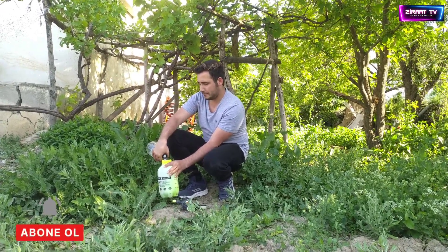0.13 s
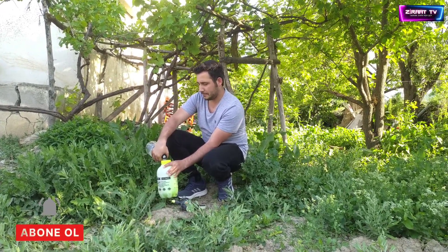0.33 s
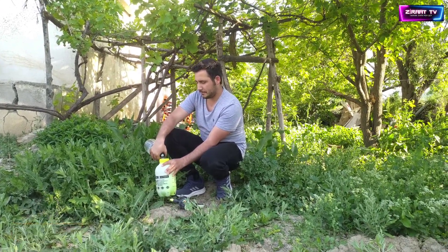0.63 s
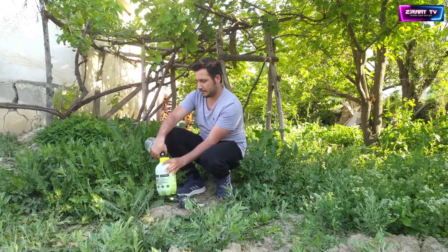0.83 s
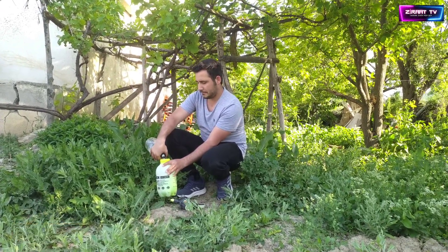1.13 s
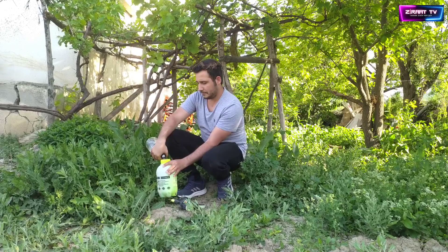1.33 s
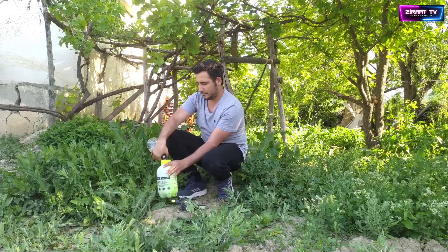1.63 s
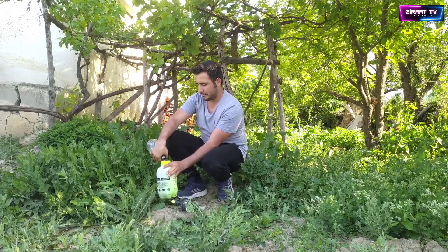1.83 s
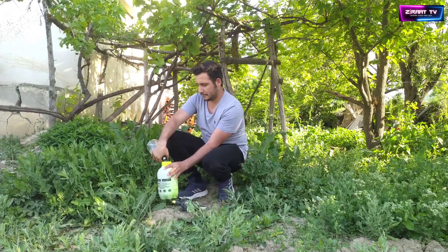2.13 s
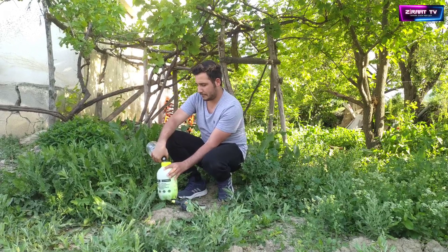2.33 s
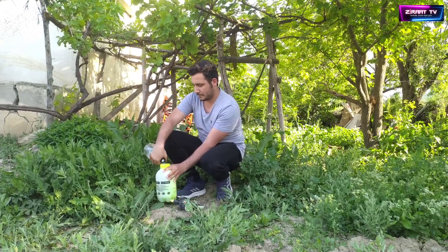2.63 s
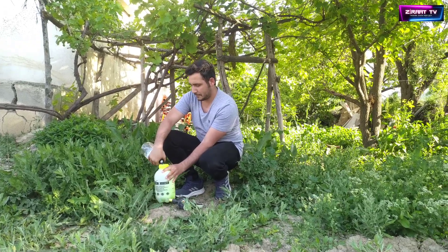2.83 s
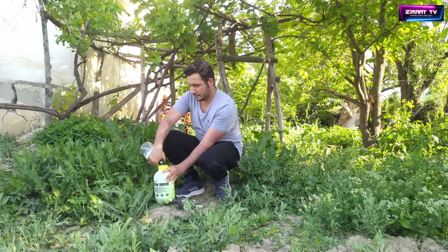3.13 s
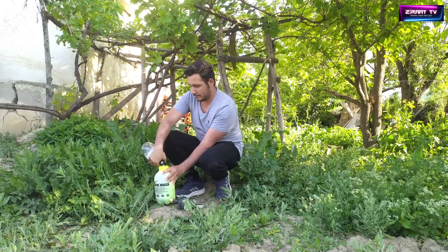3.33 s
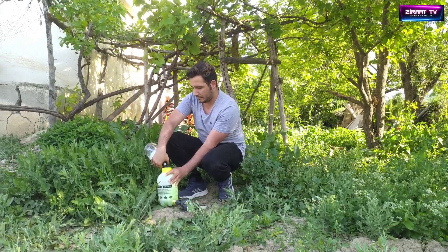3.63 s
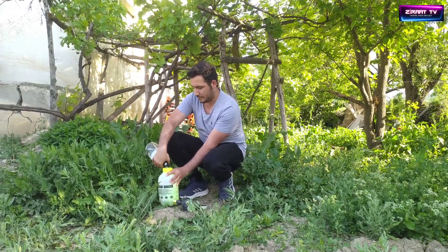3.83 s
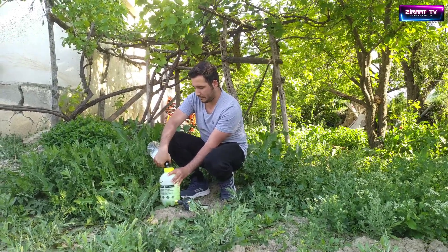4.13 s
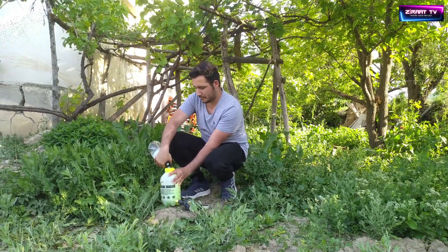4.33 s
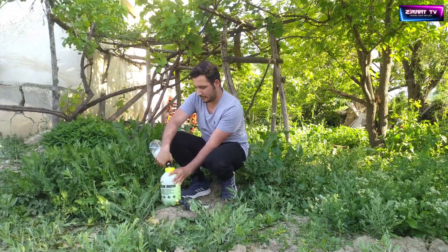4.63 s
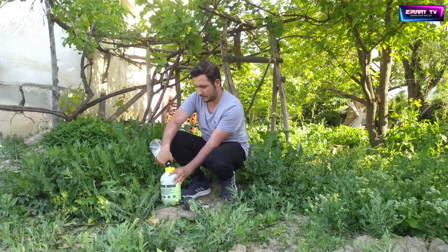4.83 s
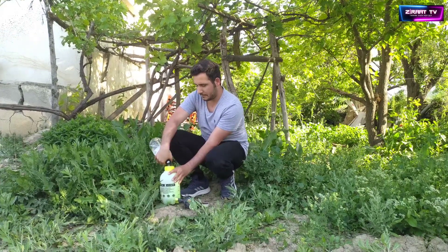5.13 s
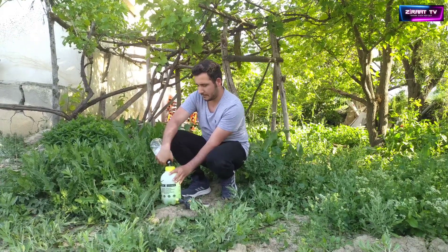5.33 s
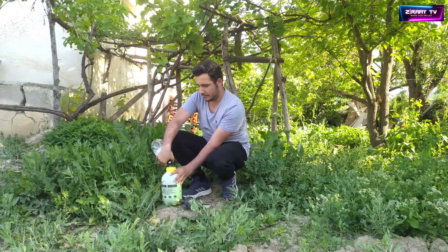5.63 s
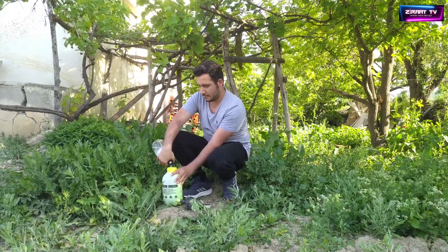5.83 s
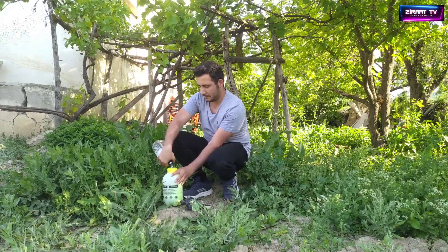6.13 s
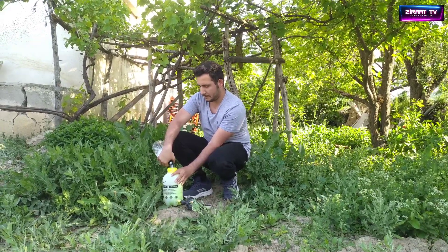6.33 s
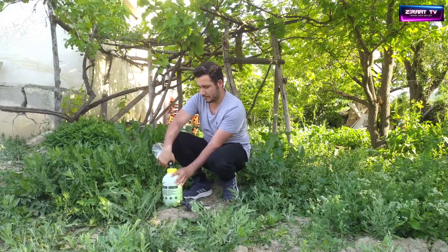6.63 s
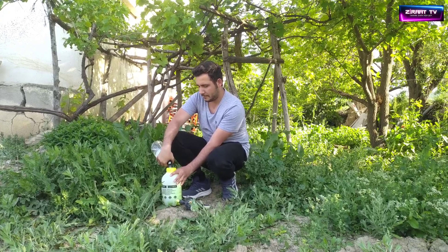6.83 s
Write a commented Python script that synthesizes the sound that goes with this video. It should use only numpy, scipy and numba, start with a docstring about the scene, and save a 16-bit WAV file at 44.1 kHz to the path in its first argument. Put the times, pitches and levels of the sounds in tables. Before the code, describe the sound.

Liquid glugs quickly and steadily from a plastic bottle into a plastic tank while sparrows chirp loudly all around a leafy garden.

```python
"""Pouring among sparrows

Liquid glugs from a plastic bottle into a garden sprayer's tank: some fourteen gulps of air a second
ring as bubbles, the stream splashes, and the resonance of the tank's air rises as the tank fills.
Hollow plastic booms as damped modes, and drops tick as short noise bursts over a fine fizz.
Sparrows chirp loudly all around, as two-voiced frequency-modulated whistles scattered by leaves and a wall.
Filtered noise makes a faint outdoor rumble and a thin hiss of leaves.
"""
import sys
import numpy as np
from scipy import signal
from scipy.fft import rfft, irfft
from scipy.io import wavfile
from scipy.ndimage import uniform_filter1d
from numba import njit

SR = 44100
rng = np.random.default_rng(int(sys.argv[2]) if len(sys.argv) > 2 else 0)


def log_audio(samples):
    """Write samples as a 16-bit WAV file to the path given in sys.argv[1]."""
    # one column per channel
    frames = np.atleast_2d(samples).T
    # limit to full scale, then quantise
    limited = np.clip(frames, -1, 1)
    pcm = np.round(limited * 32767).astype(np.int16)
    wavfile.write(sys.argv[1], SR, pcm)


N = 308259
TIME = np.arange(N) / SR


# the pour [t/s, glug level/dB, glug pitch f/Hz, air mode of the tank f/Hz]
POUR = [(0, -51, 157, 1060), (1.3, -46, 165.4, 1097), (2.5, -52.5, 169.1, 1119), (3.5, -53, 182.8, 1163),
        (4.5, -54.5, 182.5, 1192), (5.6, -57, 196.1, 1218), (7, -52.5, 212, 1266)]
# start of the first glug/s, first interval/s, and slowing/s per squared glug number
FIRST_GLUG_S, GLUG_GAP_S, GLUG_SLOWING_S = -.003, .0689, .000012


def glugs():
    """Bubble resonance: each gulp of air booms in the bottle, falling in pitch as the bubble swells."""
    times, glug_db, glug_hz = np.transpose(POUR)[:3]
    out = np.zeros(N)
    for k, (late, loud, sharp) in enumerate(rng.standard_normal((101, 3))):
        s = FIRST_GLUG_S + k * GLUG_GAP_S + k ** 2 * GLUG_SLOWING_S + 0.0013 * late
        hz = np.interp(s, times, glug_hz) * (1 + 0.035 * sharp)
        boom = bubble(hz, rise_s=0.006, decay_s=0.016, glide=-0.26)
        upper_mode = bubble(1.9 * hz, rise_s=0.0078, decay_s=0.014, glide=-0.11)
        level_db = np.interp(s, times, glug_db) + 0.56 * loud
        add(out, s, undb(level_db) * (boom + undb(-13.5) * upper_mode))
    return out


def bubble(hz, rise_s, decay_s, glide):
    """Damped oscillator: a pocket of air rings briefly while its pitch slides across hz by the share glide."""
    t = TIME[:SR // 8]
    swell = (1 - np.exp(-t / rise_s)) ** 2 * np.exp(-t / decay_s)
    pitch = hz * (1 + glide * (1 - 2 * np.exp(-t / (2 * decay_s))))
    return swell / swell.max() * np.sin(2 * np.pi * np.cumsum(pitch) / SR)


# big bubbles that burst in the tank [t/s, level/dB before scattering, f/Hz]
PLOPS = [(0.715, -47.5, 1080), (0.75, -46, 1117), (0.806, -54.5, 847), (1.175, -48.5, 1074),
         (1.312, -46, 1096), (1.477, -56, 1050), (1.52, -46, 1058), (1.602, -47.5, 833), (1.707, -49, 1024),
         (2.484, -47.5, 1108), (2.675, -49.5, 788), (2.726, -46, 1130), (3.14, -45.5, 1122),
         (3.457, -52, 1050), (3.758, -49.5, 1154), (4.242, -53, 1154), (4.418, -47.5, 1195),
         (4.546, -50.5, 1156), (4.85, -51.5, 687), (6.375, -48.5, 708)]
# splash level and its random flicker; surge level relative to a burst bubble, and its time constant
SPLASH_DB, SPLASH_FLICKER_DB, SURGE_DB, SURGE_S = -68.5, -1.5, -12.5, 0.011


def pour():
    """Cavity resonance: the splash excites the tank's shrinking air space; bursting bubbles stir it."""
    times, _, _, tank_hz = np.transpose(POUR)
    out, burble = np.zeros((2, N))
    splash = undb(SPLASH_DB + SPLASH_FLICKER_DB * walk(15))
    for s, db, hz in PLOPS:
        add(out, s, undb(db) * bubble(hz, rise_s=0.00042, decay_s=0.0092, glide=0.0076))
        surge = np.exp(-np.abs(TIME - s - SURGE_S / 2) / SURGE_S)
        splash = splash + undb(db + SURGE_DB) * surge
    impacts = droplets(rate=600, spread_db=8.0)
    air_mode = np.interp(TIME, times, tank_hz)
    low_ring = unit(resonate(impacts, air_mode, 30.0))
    high_ring = unit(resonate(impacts, 1.675 * air_mode, 120.0))
    ring = low_ring + undb(-5.5) * high_ring
    # many small bubbles at chance times
    for s, pitch, size in rng.random((420, 3)):
        small = bubble(700 + 260 * pitch, rise_s=0.0015, decay_s=0.0034, glide=0.14)
        add(burble, s * N / SR, undb(18.3 * size ** 2) * small)
    out += splash * (undb(1.5) * ring + undb(-5.0) * unit(burble))
    return garden(out, near_db=-10.0, tail_db=-31.0, t60=0.96, lag_s=0.00019)


def droplets(rate, spread_db):
    """Poisson impulses: random impacts, rate a second, many small and a few large."""
    hits = rng.random(N) < rate / SR
    sizes = undb(spread_db * np.minimum(rng.exponential(size=N), 4))
    return hits * sizes * rng.choice([-1, 1], N)


@njit
def resonate(x, hz, width):
    """State-variable resonance: a band-pass of fixed width/Hz whose centre moves."""
    y, band, low = np.empty(len(x)), 0., 0.
    for i in range(len(x)):
        g, damping = np.tan(np.pi * hz[i] / SR), width / hz[i]
        v = (band + g * (x[i] - low)) / (1 + g * (g + damping))
        band, low, y[i] = 2 * v - band, low + 2 * g * v, damping * v
    return y


# sharp droplet ticks [t/s, relative level/dB]
TICKS = [(0.3373, -43.5), (0.365, -46), (0.39, -44.5), (0.945, -43.5), (1.294, -51), (1.334, -58),
         (1.6604, -44), (1.9058, -43.5), (2.477, -42.5), (2.738, -46), (2.8739, -47), (3.4323, -51.5),
         (4.2402, -43), (4.365, -43.5), (4.4293, -45), (4.625, -52.5), (4.808, -40), (4.948, -43.5),
         (4.963, -49), (5.921, -50.5), (5.956, -51), (6.3129, -54.5), (6.512, -48.5)]
# spectrum of ticks and fizz [f/Hz, relative level/dB]
TICK_COLOUR = [(500, -18.5), (1500, 0), (4500, -2.5), (7000, 5), (9000, 9.5), (10500, -11), (15500, -11.5)]


def spatter():
    """Impact noise: drops tick on the plastic neck over a fine fizz that comes in flurries."""
    t, out = TIME[:SR // 20], np.zeros(N)
    for s, db in TICKS:
        add(out, s, undb(db + 4.0) * rng.standard_normal(len(t)) * np.exp(-t / 0.003))
    flurry_db = 4 * np.tanh(walk(5)) + 3 * walk(24)
    fizz = droplets(rate=260, spread_db=5.5) * undb(flurry_db)
    out += undb(-63.5) * unit(fizz)
    return garden(colour(out, TICK_COLOUR), near_db=0, tail_db=-15, t60=.35, lag_s=.00022)


# hollow bumps of the plastic vessels [t/s, level/dB]
BUMPS = [(4.549, -45), (4.755, -55.5), (5.295, -57), (5.333, -57), (5.492, -56.5), (6.065, -58),
         (6.228, -61), (6.317, -58.5), (6.491, -61)]
# modes that a bump sets ringing [f/Hz, relative level/dB, 60 dB decay time t60/s]
HOLLOW = [(229.3, 10.5, 0.37), (270.6, 10.5, 0.12), (346, -14, 0.54)]


def bumps():
    """Modal decay: soft bumps set the hollow plastic booming."""
    t, out = TIME[:SR // 2], np.zeros(N)
    ring = sum(undb(db) * np.sin(2 * np.pi * hz * t) * undb(-60 * t / t60) for hz, db, t60 in HOLLOW)
    for s, db in BUMPS:
        add(out, s, undb(db) * ring * (1 - np.exp(-t / 0.0031)))
    return out


# the nearest sparrow's cheeps [t/s, level/dB, accent on the high note level/dB, length ratio]
CHEEPS = [(0.021, -36.5, 2.5, 1), (0.998, -34, 5, 0.98), (2.111, -35.5, 9.5, 1), (3.014, -36, 8.5, 1.01),
          (4.067, -36, 7, .98), (5.294, -36, 4, 0.97), (6.722, -34.5, 6.5, 1.03)]
# its tune, before a small scatter in pitch [t/s from the start of the call, f/Hz]
CHEEP = [(0, 3125), (.008, 5010), (.016, 5263), (.024, 5312), (.03, 3947), (.04, 3071), (.052, 3560),
         (.06, 4442), (.069, 3257), (.074, 3537), (.079, 2410), (.084, 3336), (0.09, 2310)]
# its second voice [t/s from that voice's start, f/Hz]
UNDERTONE = [(0, 5130), (.012, 4340), (.02, 3360), (.028, 3860), (.036, 3202), (.046, 4134), (.06, 2880)]
# overall spectrum of the sparrow calls as heard [f/Hz, level/dB]
CALL_COLOUR = [(1500, -9.5), (2300, 9), (3200, 1.5), (4100, 1), (4700, 3), (5200, 3.5), (5700, 1),
               (6400, -6.5), (7500, 0), (8700, 10.5), (9600, -13.5), (10500, -2), (11300, -3), (12200, -15),
               (15500, -13)]
UNDERTONE_DELAY_S = 0.029
# the accent's time from the start of the cheep, and its Gaussian width
ACCENT_S, ACCENT_WIDTH_S = .02, .007
# random scatter of the turning points, as a share of their pitch
NEAR_SCATTER, FAR_SCATTER = .015, .035
NEAR_PAN_DB = 1  # left minus right
LEAD_S = 0.041


def near_sparrow():
    """Two-voice song: a thin lead-in, an accented high note, then a stuttering fall with a second voice."""
    out = np.zeros(N)
    for s, db, accent_db, length in CHEEPS:
        tune = sing(np.array(CHEEP) * [length, 1], NEAR_SCATTER)
        first = whistle(tune, rough=0.04, overtone_db=-11, attack_s=0.009, release_s=0.005, fade_db=-3.5)
        accent = np.exp(-((TIME[:len(first)] - ACCENT_S) / ACCENT_WIDTH_S) ** 2)
        add(out, s, undb(db + accent_db * accent) * first)
        second = whistle(sing(UNDERTONE, FAR_SCATTER), rough=0.0574, overtone_db=-16,
                         attack_s=0.0022, release_s=0.0066, fade_db=0.5)
        add(out, s + UNDERTONE_DELAY_S, undb(db - 11.5) * second)
        add(out, s + .003 - LEAD_S, undb(db - 7.0) * lead_in(LEAD_S, ratio=0.97, rough=0.15))
    heard = garden(colour(out, CALL_COLOUR), near_db=-4.5, tail_db=-12, t60=.42, lag_s=.00025)
    return heard * undb(np.array([[NEAR_PAN_DB], [-NEAR_PAN_DB]]) / 2)


def sing(tune, vary):
    """Pitch contour: straight glides between the turning points of a tune, each a little off."""
    s, hz = np.transpose(tune)
    scattered_hz = hz * np.exp(vary * rng.standard_normal(len(hz)))
    return np.interp(TIME[:int(s.max() * SR)], np.sort(s), scattered_hz)


# mean rate/Hz of the uneven pulses, and their greatest depth, reached on low notes
STUTTER_RATE, STUTTER_DEPTH = 115, .62


def whistle(hz, rough, overtone_db, attack_s, release_s, fade_db):
    """Frequency and amplitude modulation: steadier on high notes, stuttering and raspy on low ones."""
    t = TIME[:len(hz)]
    rasp, tremble, flutter = (walk(rate, size=SR // 4)[:len(t)] for rate in (2200, 260, 450))
    pitch = uniform_filter1d(hz, size=130)
    # grows as the pitch falls
    slack = np.clip((5600 - pitch) / 1800, .25, 1.3)
    phase = 2 * np.pi * np.cumsum(pitch * (1 + rough * slack * (rasp + tremble))) / SR
    envelope = np.minimum(t / attack_s, 1) * np.minimum((t[-1] - t) / release_s, 1)
    beat = 2 * np.pi * np.cumsum(STUTTER_RATE * np.exp(flutter / 2)) / SR
    depth = STUTTER_DEPTH * slack / slack.max()
    stutter = (1 + depth * np.cos(beat)) / np.sqrt(1 + depth ** 2 / 2)
    swell = envelope * stutter * undb(fade_db * t / t[-1] + 2.0 * slack * flutter)
    overtones = np.sin(2 * phase) + undb(-8.5) * np.sin(3 * phase) + undb(-21) * np.sin(4 * phase)
    hiss = undb(-13) * np.diff(rng.standard_normal(len(t) + 1))
    return np.sqrt(2) * swell * (np.sin(phase) + undb(overtone_db) * slack * (overtones + hiss))


# rising glide, before each bird's pitch ratio
LEAD_HZ, LEAD_END_HZ = 5395, 6290


def lead_in(length_s, ratio, rough):
    """Rising frequency glide: the thin high note from the second side of the syrinx."""
    pitch = ratio * np.linspace(LEAD_HZ, LEAD_END_HZ, int(length_s * SR))
    return whistle(pitch, rough=rough, overtone_db=-14, attack_s=.03, release_s=.004, fade_db=3.5)


# tunes of the far sparrows, before pitch ratio and scatter [t/s from the start of the call, f/Hz]
ZIGZAG = [(0, 3368), (.012, 5000), (.02, 3070), (.031, 4407), (.04, 2959), (.055, 3710), (.067, 2900),
          (.074, 3480), (0.087, 2520)]
DROP = [(0, 3350), (.01, 4400), (.019, 4790), (.033, 3396), (.042, 4330), (.053, 2961), (.064, 3500),
        (.075, 2735), (.083, 3030), (0.094, 2370)]
RIPPLE = [(0, 3600), (.017, 5350), (.029, 3950), (.04, 4800), (.052, 3050), (.072, 3800), (.085, 2950),
          (0.104, 2750)]
SLUR = [(0, 6300), (.018, 5735), (.045, 4913), (.056, 3223), (.076, 3400), (.097, 4740), (0.109, 3280)]
TWITTER = [(0, 4280), (.014, 3470), (.026, 3950), (.04, 2942), (0.055, 3640), (.068, 2970), (.078, 3416),
           (0.09, 2550)]
WARBLE = [(0, 3210), (.012, 5650), (.024, 5600), (.034, 4200), (.048, 3900), (.059, 2990)]
# calls from further off [t/s, level/dB, tune, pitch ratio, power share sung in open view]
FAR_CALLS = [(0.134, -50.5, TWITTER, 1.12, 0.48), (0.229, -46.5, DROP, 1.027, .4),
             (0.465, -42.5, SLUR, 1.01, 0.78), (0.734, -46.5, DROP, 1.016, 0.7),
             (1.109, -46, WARBLE, 1.14, .6), (1.44, -45.5, ZIGZAG, 0.93, 0.86),
             (1.822, -45, DROP, 0.98, 0.57), (1.945, -48.5, RIPPLE, 1.02, .2),
             (2.356, -46, ZIGZAG, 0.94, 0.41), (2.389, -46.5, SLUR, 1.07, .15),
             (2.578, -46.5, ZIGZAG, 0.95, 0.49), (2.712, -55.5, TWITTER, 0.99, .3),
             (2.888, -47, RIPPLE, 0.98, 0.29), (3.159, -46.5, RIPPLE, 0.96, 0.77),
             (3.428, -49.5, RIPPLE, 1.07, 0.35), (3.52, -54, TWITTER, 0.94, .2),
             (3.707, -45.5, ZIGZAG, 0.95, 0.49), (3.81, -49.5, WARBLE, 1.19, 0.5),
             (4.199, -54, DROP, 0.99, 0.22), (4.381, -49.5, ZIGZAG, 0.99, 0.31),
             (4.489, -55.5, DROP, 0.99, 0.35), (4.656, -48.5, DROP, 0.92, 0.84),
             (4.826, -46, ZIGZAG, 0.93, 0.8), (4.964, -55, TWITTER, 0.95, 0.68),
             (5.103, -51, DROP, 0.99, 0.5), (5.242, -45.5, SLUR, 1.02, 0.34), (5.715, -53, SLUR, 1.03, .25),
             (5.757, -45.5, ZIGZAG, 0.97, 0.88), (5.977, -49.5, RIPPLE, 0.94, 0.91),
             (6.058, -51, TWITTER, 1, 0.67), (6.368, -52, DROP, 0.91, 0.75),
             (6.547, -49.5, WARBLE, 1.04, .64), (6.684, -42.5, ZIGZAG, 1.01, 0.73),
             (6.913, -51, DROP, 0.92, 0.27)]
FAR_LEAD_S, HIGH_SLIDE_S = .055, 0.095


def flock():
    """Direct and diffuse sound: birds in view are sharp, hidden ones arrive mostly as echo."""
    open_air, hidden = np.zeros(N), chorus()
    for s, db, tune, ratio, share in FAR_CALLS:
        call, clear = undb(db) * far_call(tune, ratio), np.clip(share, 0, 1)
        add(open_air, s, np.sqrt(clear) * call)
        add(hidden, s, np.sqrt(1 - clear) * call)
        # the thin high notes carry mostly as scatter
        add(hidden, s + .008 - FAR_LEAD_S, undb(db - 7.5) * far_lead_in(ratio=0.99))
        if tune is SLUR or tune is WARBLE:
            add(hidden, s - HIGH_SLIDE_S / 2, undb(db - 4.5) * high_slide())
    in_view = garden(colour(open_air, CALL_COLOUR), near_db=-7.5, tail_db=-8, t60=.4, lag_s=.00023)
    return in_view + garden(colour(hidden, CALL_COLOUR), near_db=15, tail_db=11, t60=0.96, lag_s=-.0001)


# second voice: mean pitch ratio to the first, random wander of that ratio, relative level
SECOND_RATIO, SECOND_WANDER, SECOND_DB = 1.17, .08, -5.5
# trill length, mean time of one turn, centre pitch and swing before drift
TRILL_S, TRILL_TURN_S, TRILL_MID_HZ, TRILL_DEPTH_HZ = 0.12, 0.03, 3190, 341
TRILL_UNEVEN = .3  # spread of the trill's pace, in natural-log units
# second voice of the trill: start pitch of each slide, relative level
SLIDE_HZ, SLIDE_DB = 4900, -2


def far_call(tune, ratio):
    """Two-voice modulation: a tune sung with two clashing voices; a warble carries on as a trill."""
    pitch = ratio * sing(tune, FAR_SCATTER)
    if tune is not WARBLE:
        above = pitch * (SECOND_RATIO + SECOND_WANDER * walk(89.43, size=SR // 4)[:len(pitch)])
        first = whistle(pitch, rough=.032, overtone_db=-12, attack_s=.009, release_s=.015, fade_db=-2)
        second = whistle(above, rough=.036, overtone_db=-15, attack_s=.02, release_s=.025, fade_db=-1)
        return (first + undb(SECOND_DB) * second) / np.sqrt(1 + undb(SECOND_DB) ** 2)
    pace = np.exp(TRILL_UNEVEN * walk(40.05, size=SR // 4)[:int(TRILL_S * SR)]) / TRILL_TURN_S
    turn = np.cumsum(pace) / SR % 1
    drift = 1 + FAR_SCATTER * walk(59.95, size=SR // 4)[:len(turn)]
    trill = drift * (TRILL_MID_HZ - TRILL_DEPTH_HZ * np.cos(2 * np.pi * turn))
    call = whistle(np.r_[pitch, trill], rough=0.0253, overtone_db=-11.5,
                   attack_s=0.0081, release_s=0.0088, fade_db=-1.0)
    # at each turn the second voice slides down towards the trill
    slide_pitch = (SLIDE_HZ + (TRILL_MID_HZ - SLIDE_HZ) * turn ** 2) / drift
    slides = whistle(slide_pitch, rough=0.0317, overtone_db=-31,
                     attack_s=0.0044, release_s=0.0073, fade_db=0.0)
    return call + undb(SLIDE_DB) * np.r_[np.zeros(len(pitch)), slides * np.sin(np.pi * turn)]


# random spread of the lead-in: pitch in natural-log units, level in dB
LEAD_VARY, LEAD_VARY_DB = .065, 2.5


def far_lead_in(ratio):
    """Random variation: a rising lead-in glide at a chance pitch and strength."""
    sharp, loud = rng.standard_normal(2)
    note = lead_in(FAR_LEAD_S, ratio=ratio * np.exp(LEAD_VARY * sharp), rough=.2)
    return undb(LEAD_VARY_DB * loud) * note


HIGH_SLIDE_HZ, HIGH_SLIDE_END_HZ = 7700, 5660


def high_slide():
    """Falling frequency glide: slurs and warbles open with a thin, very high note."""
    pitch = np.linspace(HIGH_SLIDE_HZ, HIGH_SLIDE_END_HZ, int(HIGH_SLIDE_S * SR))
    return whistle(pitch, rough=.2, overtone_db=-20, attack_s=.015, release_s=.015, fade_db=2)


def chorus():
    """Random superposition: faint calls from deep in the trees, one at a chance time in each time slot."""
    out, tunes = np.zeros(N), (ZIGZAG, DROP, RIPPLE, SLUR)
    for k, (when, loud, sharp) in enumerate(rng.random((18, 3))):
        call = far_call(tunes[k % len(tunes)], 1 + .2 * sharp)
        add(out, (k + when) * N / SR / 18, undb(-64 + 6 * loud) * call)
    return out


# spectra of the rumble and of the leaves [f/Hz, relative level/dB]
RUMBLE = [(20, 0.5), (40, -5.5), (80, 1.5), (120, -10), (200, -6.5), (330, -11.5), (500, -23), (1000, -24),
          (2000, -44)]
LEAVES = [(200, 2.5), (550, 1), (850, 2), (1600, -1.5), (3200, 3), (5000, -5), (6800, 1), (8800, -5),
          (10500, -22), (12500, -36), (15500, -34)]
# course of the distant rumble [t/s, level/dB]
RUMBLE_LEVEL = [(0, -57.5), (4.4, -58), (5.8, -59), (7, -58)]


def outdoors():
    """Filtered noise: a rumble partly shared by both sides, and a thin restless hiss of leaves."""
    rumble = unit(colour(rng.standard_normal(N) + 0.52 * rng.standard_normal((2, N)), RUMBLE))
    leaves = unit(colour(rng.standard_normal((2, N)), LEAVES))
    stir_db = 1.8 * walk(4) + 2.2 * walk(22)
    rumble_db = np.interp(TIME, *np.transpose(RUMBLE_LEVEL))
    return undb(rumble_db) * rumble + undb(-60.5 + stir_db) * leaves


ECHO_RATE = 70  # mean separate echoes a second, from trunks and the wall


def garden(x, near_db, tail_db, t60, lag_s):
    """Reverberation: direct sound, quick scatter from ground and leaves, echoes from trees and wall."""
    t = TIME[:SR]
    near, haze, signs = rng.standard_normal((3, 2, SR))
    near *= np.exp(-t / 0.012) * (t > .001)
    echoes = np.sign(signs) * (rng.random((2, SR)) < ECHO_RATE / SR)
    tail = (unit(echoes) + haze / 2) * undb(-60 * t / t60) * (1 - np.exp(-t / 0.017))
    scatter = (undb(near_db) * unit(near) + undb(tail_db) * unit(tail)) / np.sqrt(SR)
    scattered = signal.fftconvolve(x[None], scatter, axes=1)[:, :N]
    return (direct(x, lag_s) + scattered) / np.sqrt(1 + undb(near_db) ** 2 + undb(tail_db) ** 2)


def direct(x, lag_s):
    """Interaural-style delay: the straight path reaches the left port lag_s after the right."""
    return np.array([np.roll(x, int(round(lag_s * SR))), x])


def colour(x, points, power=1):
    """Minimum-phase filtering: a causal filter through (f/Hz, level/dB) points, raised to a power."""
    hz, db = np.transpose(points)
    size = 2 ** 19
    gain_db = np.interp(np.log(np.fft.rfftfreq(size, 1 / SR) + 1), np.log(hz), db)
    log_gain = power * np.log(undb(gain_db))
    # folding the cepstrum onto positive time makes the filter causal
    cepstrum = irfft(log_gain)[:size // 2]
    cepstrum[1:] *= 2
    return irfft(rfft(x, size) * np.exp(rfft(cepstrum, size)))[..., :N]


def walk(rate, size=N):
    """Interpolated noise: glides linearly to a new normal value rate times a second."""
    knots = np.arange(size) * rate / SR
    return np.interp(knots, np.arange(size // 8 + 2), rng.standard_normal(size // 8 + 2))


def undb(db):
    """Logarithmic level: decibels to amplitude gain."""
    return 10 ** (np.asarray(db) / 20)


def unit(x):
    """Normalization: scale to rms 1."""
    return x / np.sqrt(np.mean(x ** 2))


def add(out, s, x):
    """Superposition: mix x into out from time s on, cut at the ends."""
    i = int(s * SR)
    x = x[max(-i, 0):max(N - i, 0)]
    out[max(i, 0):max(i, 0) + len(x)] += x


def scene():
    """Superposition: the pour among the birds; its long low waves pass the leaves unscattered."""
    booms = direct(glugs() + bumps(), lag_s=.0002)
    return booms + pour() + spatter() + near_sparrow() + flock() + outdoors()


# left minus right colour of the two microphone ports [f/Hz, level/dB]
PORTS = [(200, 0.5), (1400, 0.5), (2500, 5), (3300, 2), (4400, 3.5), (5200, 3.5), (6800, 8), (8100, 2),
         (9000, -16.5), (9600, -22.5), (10600, 2), (12500, -11.5), (15000, -0.5)]
TOP_HZ = 15550


def record(dry):
    """Linear filtering: each port colours the sound in its own way, and a steep low-pass cuts the top."""
    ports = np.array([colour(dry[0], PORTS, power=.5), colour(dry[1], PORTS, power=-.5)])
    return signal.sosfilt(signal.ellip(10, .2, 80, TOP_HZ, fs=SR, output="sos"), ports)


dry = scene()
out = record(dry)
log_audio(out)
```